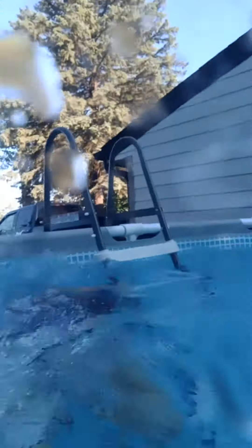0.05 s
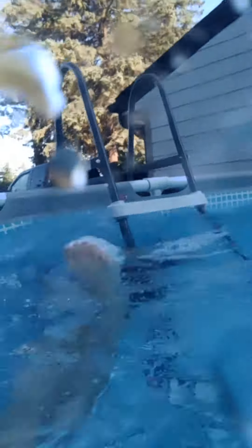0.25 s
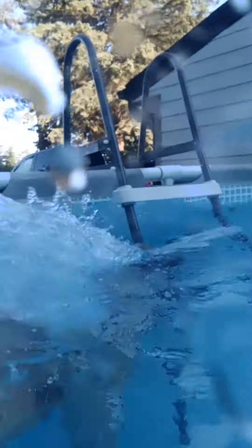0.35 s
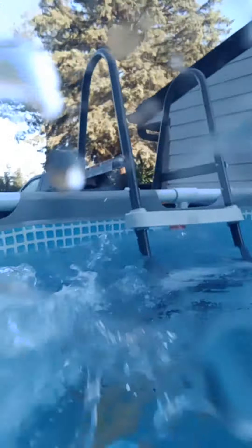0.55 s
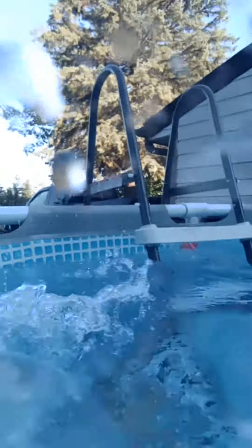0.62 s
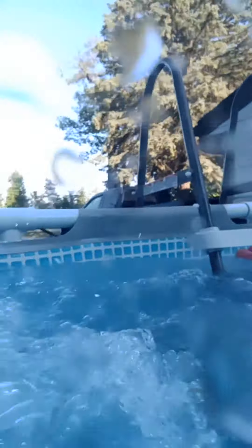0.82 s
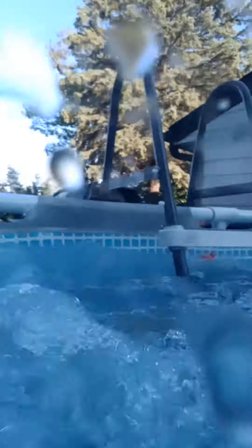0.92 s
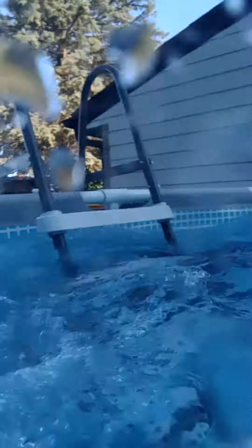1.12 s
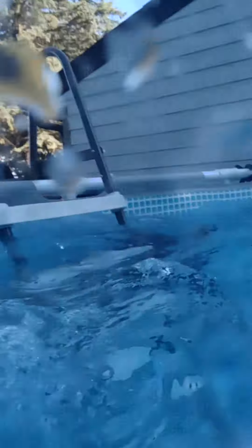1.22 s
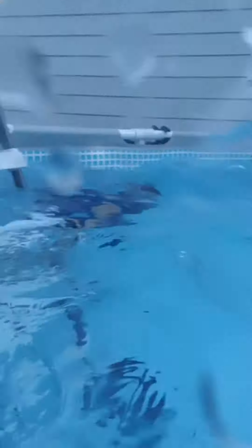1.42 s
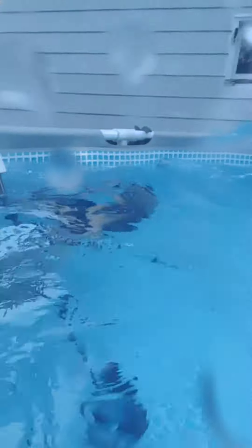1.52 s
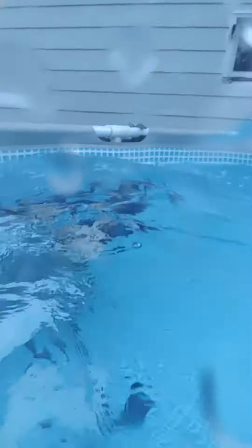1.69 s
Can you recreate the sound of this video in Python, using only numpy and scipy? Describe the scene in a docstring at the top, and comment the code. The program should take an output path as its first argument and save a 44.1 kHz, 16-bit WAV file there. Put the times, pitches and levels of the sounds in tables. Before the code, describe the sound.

A swimmer's kick splashes into a backyard pool, gurgling and sloshing right against a wet microphone

```python
"""Pool kick beside a waterline microphone

A swimmer's kick plunges into a backyard pool, right beside a wet microphone.
Big air pockets gurgle and overload it, smaller bubbles slosh and plop: damped sines of rising pitch.
Wavelets slap the casing (pressure pulses, gulped air); drops tick on its port and tap the casing.
Spray crackles, thrown water falls back in droplet runs; wash, surge and far lapping are coloured noise.
"""
import sys
import numpy as np
from scipy import signal
from scipy.fft import rfft, irfft, next_fast_len
from scipy.io import wavfile
from scipy.ndimage import uniform_filter1d

SR = 44100
rng = np.random.default_rng(int(sys.argv[2]) if len(sys.argv) > 2 else 0)


def dump_mix(stems):
    """Bounce the given channels to the path in sys.argv[1] as a 16-bit WAV at rate SR."""
    frames = np.atleast_2d(stems).T  # one column per channel
    limited = np.clip(frames, -1, 1)  # hard clip at full scale
    pcm = np.round(limited * 32767).astype(np.int16)
    wavfile.write(sys.argv[1], SR, pcm)


N = 77175
TIME = np.arange(N) / SR

# small surface bubbles, relative level; also drives the wash: t/s, level/dB
SLOSH_LEVEL = [(0.0, -37), (0.032, -51), (0.088, -34), (0.231, -38.5), (0.287, -33.5), (0.359, -38),
               (0.431, -38), (0.503, -29.5), (0.535, -23), (0.607, -32.5), (0.822, -32.5), (0.87, -40.5),
               (0.942, -28), (0.985, -41.5), (1.04, -37.5), (1.135, -30.5), (1.175, -36), (1.28, -31.5),
               (1.413, -43), (1.485, -29.5), (1.604, -51), (1.692, -33), (1.748, -45.5)]


def from_db(db):
    """Decibels to amplitude ratio."""
    return 10 ** (np.asarray(db) / 20)


def rms_one(x):
    """Scale to unit RMS."""
    return x / np.sqrt(np.mean(x ** 2) + 1e-20)


def level(rows):
    """Gain per sample from (t/s, level/dB) rows, linear in dB between them."""
    return from_db(np.interp(TIME, *np.transpose(rows)))


def add(out, start_s, wave):
    """Mix a short wave in at a time."""
    i = max(int(start_s * SR), 0)
    out[i:i + len(wave)] += wave[:max(N - i, 0)]


def filtered(x, order, edge_hz, kind="low"):
    """Causal Butterworth filter."""
    return signal.sosfilt(signal.butter(order, edge_hz, kind, fs=SR, output="sos"), x)


def colour(x, points):
    """Minimum-phase filter through (f/Hz, relative density/dB) points, of unit power gain."""
    size = next_fast_len(N + 8192)
    size += size % 2
    point_hz, point_db = np.transpose(points)
    bin_hz = np.arange(size // 2 + 1) * SR / size
    gain_db = np.interp(np.log(bin_hz + 1), np.log(point_hz), point_db)
    cepstrum = irfft(np.log(rms_one(from_db(gain_db))))
    # fold the cepstrum: minimum phase
    cepstrum[1:size // 2] *= 2
    cepstrum[size // 2 + 1:] = 0
    return irfft(rfft(x, size) * np.exp(rfft(cepstrum)))[:N]


def evened(x, window_s):
    """Hold the short-term level near 1, leaving the grain."""
    size = max(int(window_s * SR), 8)
    power = uniform_filter1d(uniform_filter1d(x ** 2, size), size)
    return x / np.sqrt(np.abs(power) + 1e-12)


def flutter(per_s, depth_db):
    """Random gain: a normal draw in dB at each step, linear in between."""
    return from_db(depth_db * np.interp(TIME * per_s, np.arange(N), rng.standard_normal(N)))


def bubble(hz, t60_s):
    """A damped sine that rises in pitch as the bubble nears the surface."""
    attack_cycles = 0.43
    rise_per_t60 = 0.044  # share of the pitch
    t = np.arange(int(t60_s * SR)) / SR
    cycles = hz * (t + rise_per_t60 * t * t / (2 * t60_s))
    attack = 1 - np.exp(-t * hz / attack_cycles)
    return np.sin(2 * np.pi * cycles) * from_db(-60 * t / t60_s) * attack


def bubble_cloud(low_hz, high_hz, cycles, spread_db, even_s, count):
    """Bubbles of random strength, pitch and life, born all along; level near 1."""
    skirt_share = 0.66  # high-pass edge / lowest pitch
    out = np.zeros(N)
    for k, (when, pitch, size, life) in enumerate(rng.random((count, 4))):
        hz = low_hz * (high_hz / low_hz) ** pitch
        start_s = (k + 2 * when - 1) / count * N / SR
        gain = (-1) ** k * from_db(spread_db * size ** 2)
        add(out, start_s, gain * bubble(hz, cycles * (.5 + life) / hz))
    return evened(filtered(out, 2, skirt_share * low_hz, "high"), even_s)


def lapping():
    """Far lapping of the pool: steady coloured noise."""
    # f/Hz, relative density/dB
    lapping_colour = [(35, -37), (90, 0.5), (500, 32), (1200, -8), (2500, -35), (8000, -37), (10500, -61)]
    return from_db(-48.5) * colour(rng.standard_normal(N), lapping_colour)


def wash():
    """Rush of the breaking surface: fluttering noise that follows the slosh, plus the leg's swish."""
    # f/Hz, relative density/dB
    wash_colour = [(400, -23), (900, -3.5), (1900, -8.5), (2700, -21), (6000, -48)]
    # the leg sweeps up to the surface
    swish_at_s, swish_width_s, swish_db = 0.11, 0.049, -42
    swish = from_db(swish_db) * np.exp(-((TIME - swish_at_s) / swish_width_s) ** 2)
    gain = from_db(-13.5) * level(SLOSH_LEVEL) + swish
    return gain * flutter(per_s=120, depth_db=3.5) * colour(rng.standard_normal(N), wash_colour)


def spray(per_s, spread_db, mist_db):
    """Fine crackle over a fluttering mist, with the pings of tiny bubbles."""
    # relative level: t/s, level/dB
    spray_level = [(0.0, -65), (0.096, -49), (0.216, -60.5), (0.359, -63.5), (0.375, -50), (0.511, -52),
                   (0.575, -56), (0.607, -53), (0.639, -60.5), (0.806, -62.5), (0.878, -55.5),
                   (1.046, -58.5), (1.07, -55), (1.277, -52), (1.36, -51), (1.405, -60), (1.477, -49.5),
                   (1.517, -61), (1.59, -64), (1.64, -58), (1.748, -58.5)]
    # as heard through the wet port: f/Hz, relative density/dB
    spray_colour = [(2300, -5.5), (3200, 3), (5200, 2), (6300, 2), (8700, 9.5), (9600, 0), (10600, -8.5),
                    (16000, -23)]
    hits = rng.random(N) < per_s / SR
    strength = from_db(spread_db * np.minimum(rng.exponential(1, N), 5))
    clicks = hits * strength * rng.choice([-1, 1], N)
    pings = bubble_cloud(2300, 10350, cycles=42, spread_db=28.5, even_s=0.025, count=2200)
    mist = from_db(mist_db) * flutter(per_s=170, depth_db=9.5) * rng.standard_normal(N)
    fine = from_db(-8.0) * evened(clicks, 0.2) + mist + from_db(-4.5) * pings
    fine = filtered(colour(fine, spray_colour), 2, 1200, "high")
    return level(spray_level) * from_db(2.5) * fine


def spatters(count):
    """Each sheet of thrown water lands as a quick run of droplets, the higher ones weaker on average."""
    # sheets falling back: t/s, base level/dB
    sheets = [(0.381, -18), (.4127, -24), (0.4396, -22), (0.54, -14), (0.6564, -20), (0.7352, -15)]
    run_s, low_hz, high_hz = 0.0098, 1300, 6000
    ring_cycles, tilt_db_per_octave = 7.5, -5
    out = np.zeros(N)
    for start_s, db in sheets:
        for k, (when, pitch, size) in enumerate(rng.random((count, 3))):
            octaves = pitch * np.log2(high_hz / low_hz)
            hz = low_hz * 2 ** octaves
            gain = (.5 + size) * from_db(db + tilt_db_per_octave * octaves)
            add(out, start_s + run_s * (k + when) / count, gain * bubble(hz, ring_cycles / hz))
    return out


def taps():
    """A drop on the hard casing is one dry click: a band-passed impulse."""
    # t/s, impulse level before the band-pass/dB
    casing_drops = [(0.6202, -12.5), (1.023, -21), (1.1935, -18), (1.266, -15.5)]
    out = np.zeros(N)
    for start_s, db in casing_drops:
        add(out, start_s, from_db([db]))
    return filtered(out, 1, [5500, 12000], "band")


def ticks():
    """A drop bursts on the port in a short bright spit of noise."""
    # t/s, relative level/dB
    port_drops = [(.319, -18.5), (.3633, -14.5), (.3848, -9), (.439, -6.5), (0.505, -6), (0.6041, -5.5),
                  (1.4857, -21.5)]
    # as heard through the wet port: f/Hz, relative density/dB
    tick_colour = [(1500, -3.5), (4500, -7.5), (6200, -0.5), (8500, 5.5), (9600, -1.5), (11000, -20.5),
                   (16000, -21)]
    t60_s, attack_s = 0.013, 0.00092
    envelope = np.zeros(N)
    t = np.arange(SR // 10) / SR
    for start_s, db in port_drops:
        add(envelope, start_s, from_db(db - 60 * t / t60_s) * (1 - np.exp(-t / attack_s)))
    return from_db(-7.5) * colour(envelope * rng.standard_normal(N), tick_colour)


def slaps():
    """Each wavelet pushes and pulls the pressure once, gulps air, then traps a few small bubbles."""
    # wavelets on the casing: t/s, pulse level before low-pass/dB, pulse and gulp pitch/Hz, low-pass/Hz
    wavelets = [(0.0711, -23, 930, 4040), (.1795, -22, 774, 2380), (0.2532, -26, 635, 3826),
                (.294, -15.5, 590, 5000), (0.8977, -11.5, 592, 1350), (0.9992, -16, 432, 1470),
                (1.021, -9, 910, 1390), (1.1096, -26, 1030, 6040), (1.2136, -15.5, 694, 2280),
                (1.283, -15, 750, 2290), (1.3905, -18.5, 810, 5760), (1.4422, -26.5, 830, 2200),
                (1.466, -17.5, 2000, 5650), (1.5308, -18.5, 666, 2430), (1.5723, -10.5, 506, 2600)]
    gulp_db, gulp_cycles = -13, 3.9  # the gulped air rings only briefly; not scaled by the slap
    splatter_db, splatter_s, splatter_t60_s = -27.5, 0.0054, 0.022  # dB relative to the slap
    out = np.zeros(N)
    for start_s, db, hz, top_hz in wavelets:
        u = 2 * np.pi * hz * (TIME - start_s)
        pulse = -u / (1 + u * u) ** 2
        out += from_db(db) * filtered(pulse / pulse.max(), 4, top_hz)
        add(out, start_s, -from_db(gulp_db) * bubble(hz, gulp_cycles / hz))
        for when, pitch, size in rng.random((3, 3)):
            gain = 2 * size * from_db(splatter_db + db)
            add(out, start_s + when * splatter_s, gain * bubble(hz * 2 ** (2 * pitch), splatter_t60_s))
    return out


def plops():
    """Single bubbles, and short rings of the drops and slaps: damped sines of rising pitch."""
    # t/s, starting pitch/Hz, level before attack and decay/dB, t60/s
    bubbles_and_rings = [(.069, 877, -16.5, 0.024), (.0705, 2470, -38, 0.046), (.099, 524, -17.5, 0.045),
                         (.141, 550, -15, 0.032), (.208, 535, -1.5, 0.009), (0.213, 152, -7.5, 0.028),
                         (.355, 167, 1, 0.019), (0.412, 183.2, -2.5, .11), (0.437, 287, 8, 0.052),
                         (.504, 6220, -22.5, 0.017), (.518, 364, -11.5, 0.11), (.545, 325.6, 4, 0.077),
                         (.606, 1940, -14, 0.013), (.672, 454, -6.5, 0.049), (.735, 445, 1.5, .036),
                         (0.776, 2100, -24, 0.027), (.832, 597, -7.5, 0.051), (0.951, 538, -9.5, 0.04),
                         (1, 1310, -18.5, .014), (1.275, 141, -1.5, 0.019), (1.451, 223, -3.5, 0.017),
                         (1.4785, 2990, -33.5, 0.048), (1.481, 880, -6, 0.036), (1.482, 2265, -19, .023),
                         (1.531, 1122, -20, 0.045), (1.65, 1325, -28, 0.038), (1.68, 766, -19.5, 0.023)]
    out = np.zeros(N)
    for start_s, hz, db, t60_s in bubbles_and_rings:
        add(out, start_s, from_db(db) * bubble(hz, t60_s))
    return out


def churn():
    """Air driven under by the kick: the larger the bubble, the lower it rings; the water heaves below."""
    # relative levels of big air pockets, middle-sized bubbles, heave of the water: t/s, level/dB
    pocket_level = [(0.0, -47.5), (0.08, -40), (0.136, -48), (0.455, -12.5), (0.655, -19), (0.71, -33),
                    (0.742, -22.5), (0.878, -46.5), (0.91, -38), (0.982, -41), (1.133, -39), (1.173, -41.5),
                    (1.349, -34), (1.413, -48.5), (1.469, -30.5), (1.612, -49.5), (1.748, -43.5)]
    gurgle_level = [(0.0, -44.5), (0.056, -43.5), (0.08, -41), (0.239, -34), (0.287, -22), (0.311, -36.5),
                    (0.431, -15), (0.734, -19.5), (0.79, -26.5), (0.966, -26), (0.982, -51), (1.062, -30),
                    (1.421, -48), (1.453, -25), (1.58, -65), (1.612, -57.5), (1.684, -35.5), (1.748, -36)]
    surge_level = [(0, -45.5), (.168, -61), (.216, -44.5), (.471, -26), (.495, -53), (.615, -54),
                   (.75, -43.5), (1.221, -55), (1.261, -42), (1.437, -52)]
    # heave of the water: f/Hz, relative density/dB
    surge_colour = [(25, -42), (60, 14.5), (90, 29.5), (170, -38)]

    pockets = bubble_cloud(121.5, 301.0, cycles=7.0, spread_db=8.0, even_s=0.03, count=220)
    gurgle = bubble_cloud(313.4, 652, cycles=13.2, spread_db=11.5, even_s=0.014, count=280)
    slosh = bubble_cloud(690, 1240, cycles=14.0, spread_db=16.5, even_s=0.05, count=600)
    fizz = bubble_cloud(1300, 1910, cycles=45.0, spread_db=38.0, even_s=0.045, count=600)
    surge = evened(colour(rng.standard_normal(N), surge_colour), 0.031)

    out = from_db(3.5) * level(pocket_level) * pockets
    out += from_db(1.83) * level(gurgle_level) * gurgle
    out += level(SLOSH_LEVEL) * (from_db(-3.5) * slosh + from_db(-16.0) * fizz)
    return out + from_db(8.5) * level(surge_level) * surge


def scene():
    """Everything is close to the microphone, over the lapping of the pool; one channel."""
    drops = spray(per_s=1900, spread_db=1.5, mist_db=-10.0) + spatters(count=7) + taps() + ticks()
    return (lapping() + wash() + drops + slaps() + plops() + churn())[None]


def record(dry):
    """Overload flattens the loud lows while the treble rides over them; the top is cut."""
    ceiling, knee, overload_top_hz, stopband_hz = 0.34, 20.4, 4550, 17300
    low = signal.sosfiltfilt(signal.butter(2, overload_top_hz, fs=SR, output="sos"), dry)
    flattened = low / (1 + np.abs(low / ceiling) ** knee) ** (1 / knee)
    top_cut = signal.cheby2(12, 70, stopband_hz, fs=SR, output="sos")
    return signal.sosfilt(top_cut, dry - low + flattened)


dry = scene()
out = record(dry)
dump_mix(out)
```